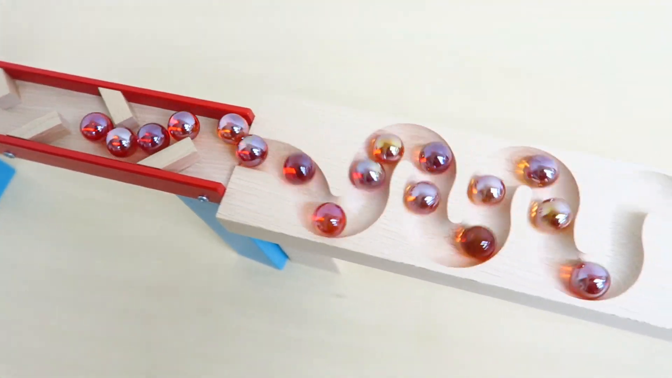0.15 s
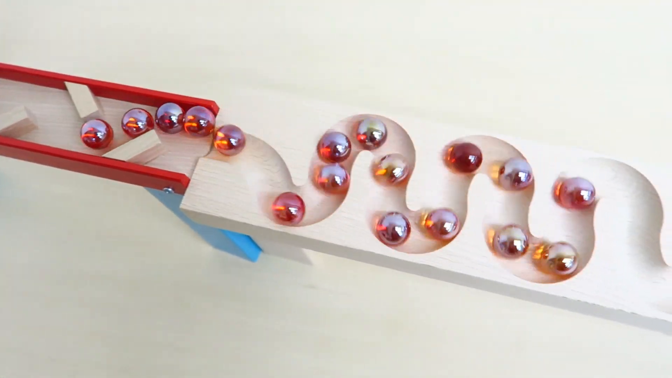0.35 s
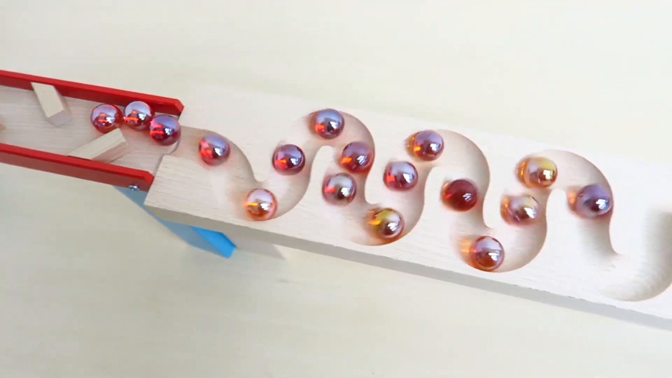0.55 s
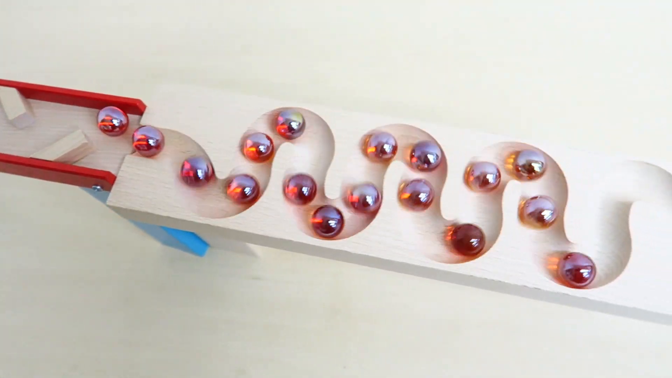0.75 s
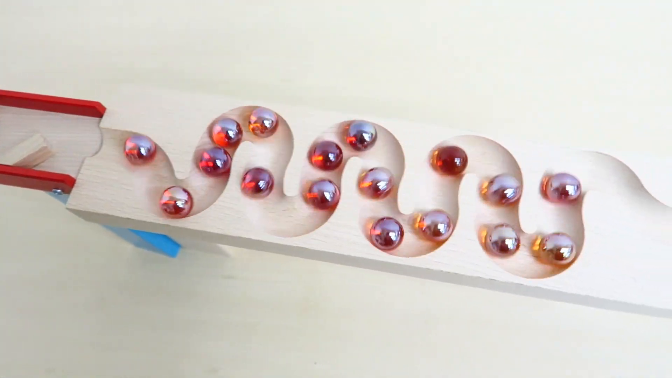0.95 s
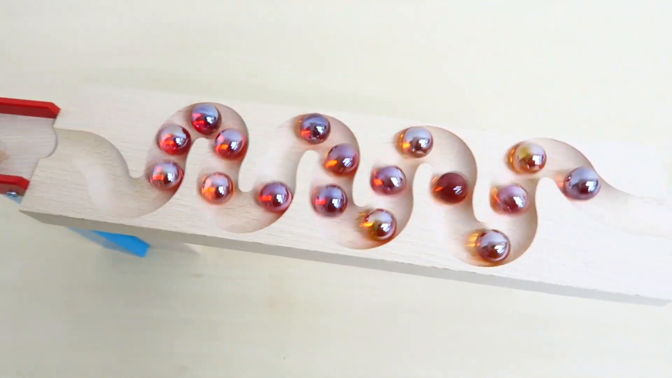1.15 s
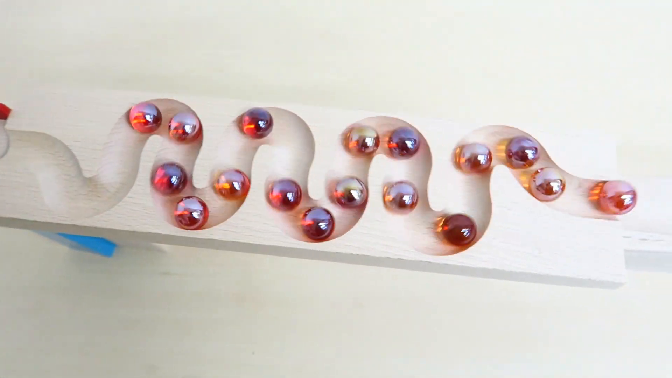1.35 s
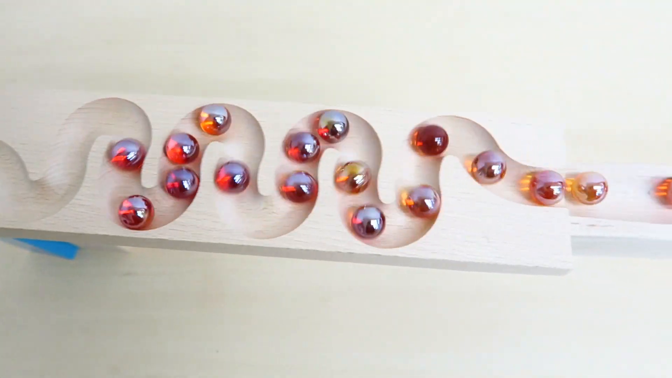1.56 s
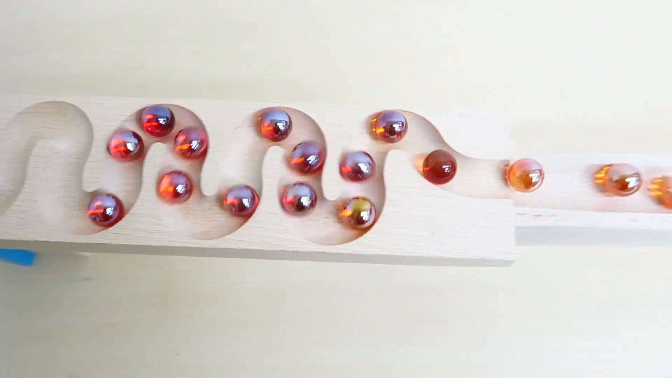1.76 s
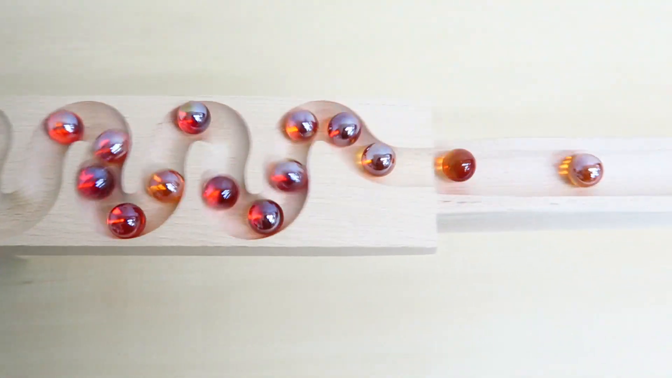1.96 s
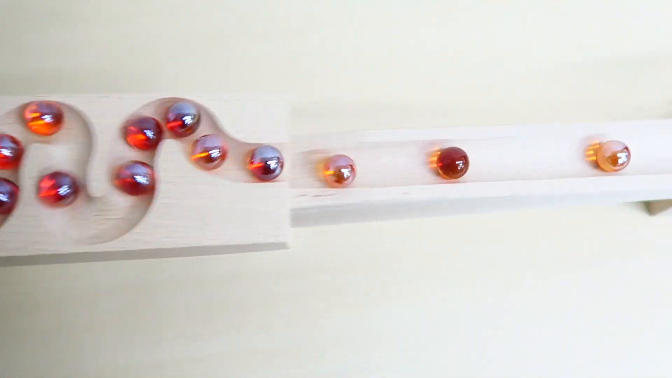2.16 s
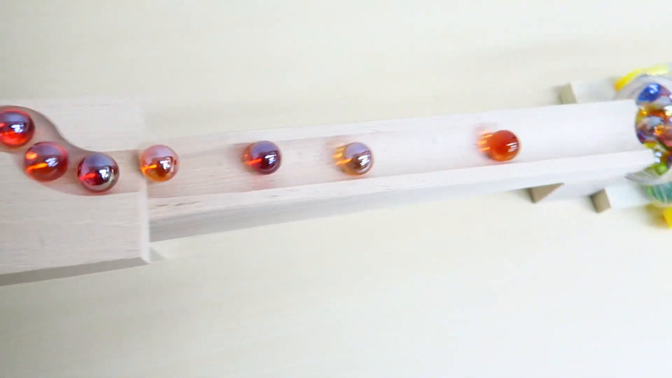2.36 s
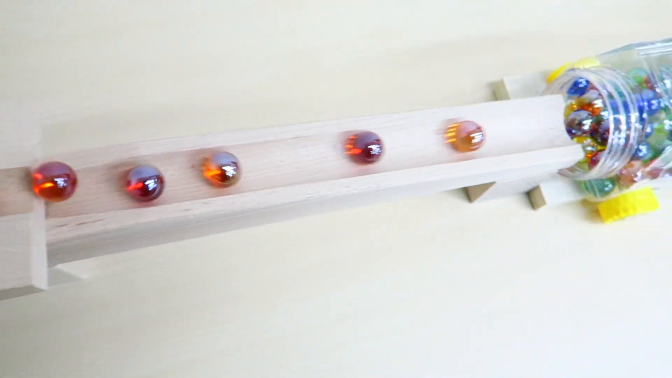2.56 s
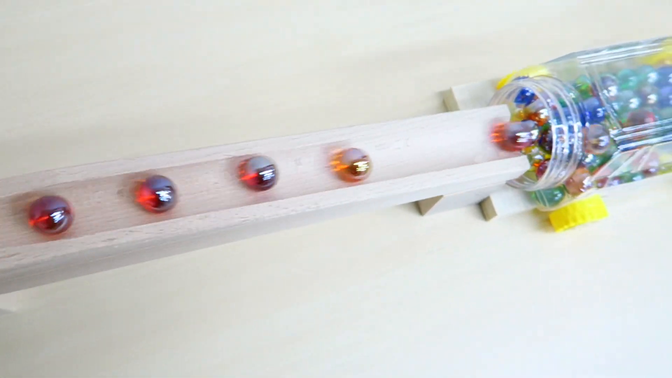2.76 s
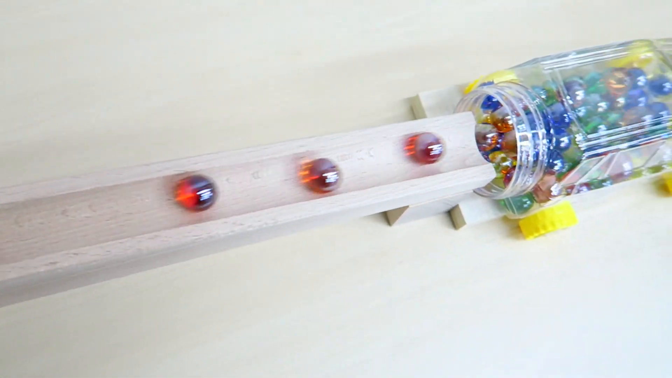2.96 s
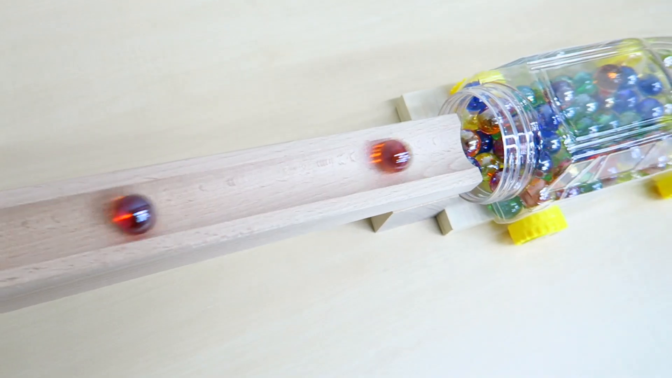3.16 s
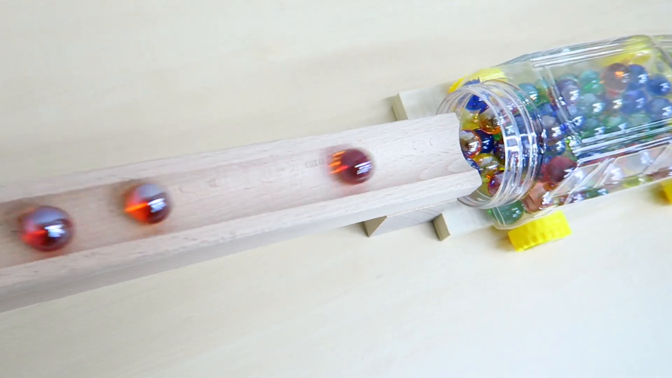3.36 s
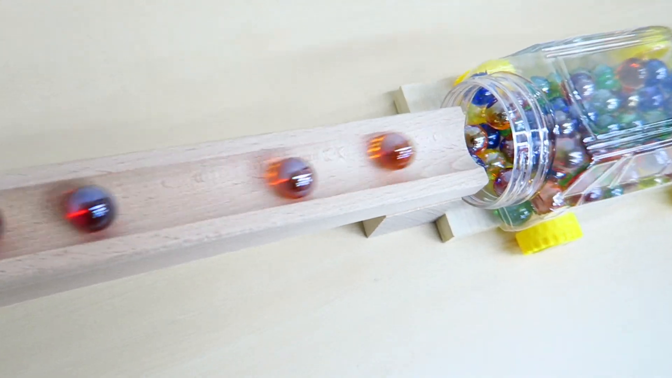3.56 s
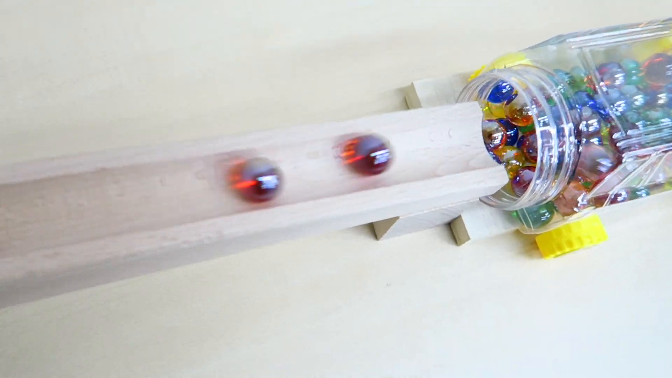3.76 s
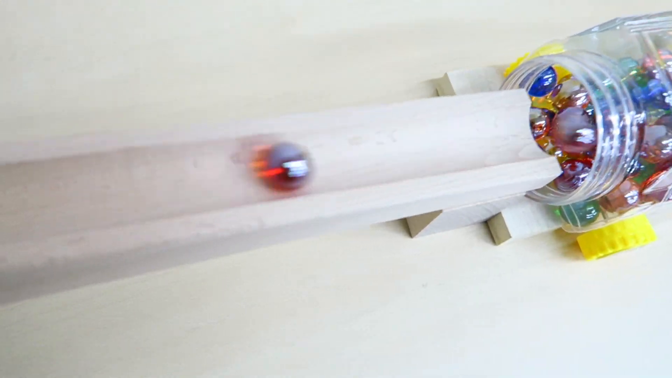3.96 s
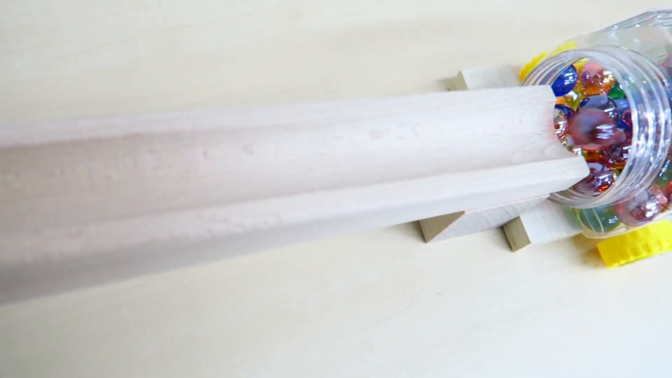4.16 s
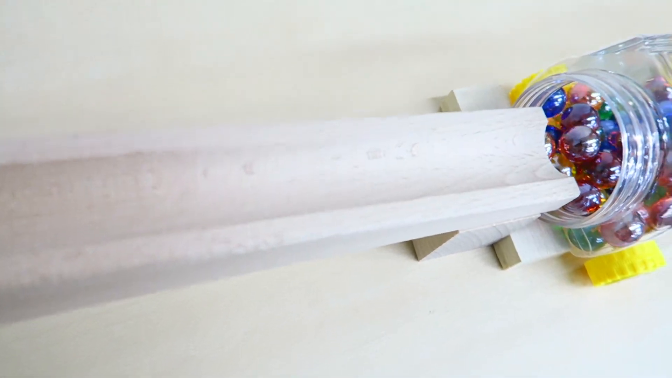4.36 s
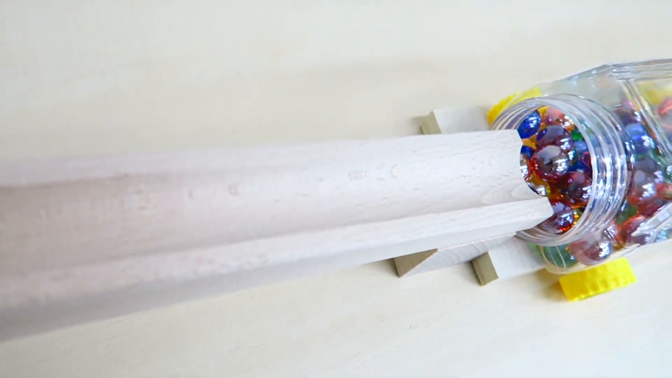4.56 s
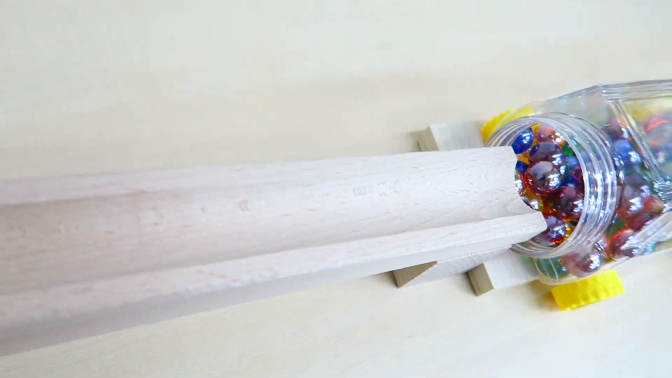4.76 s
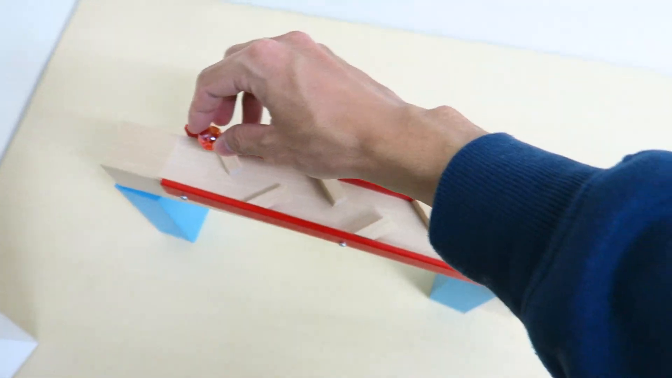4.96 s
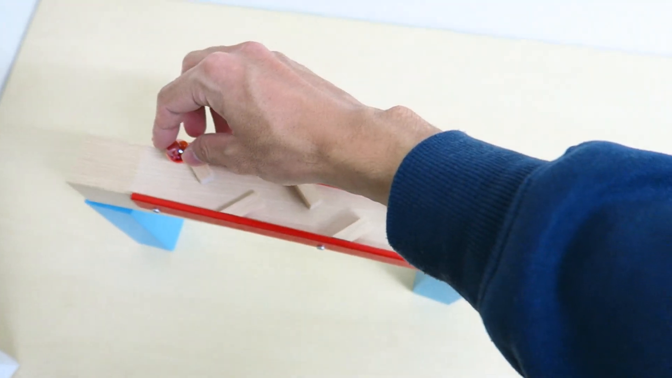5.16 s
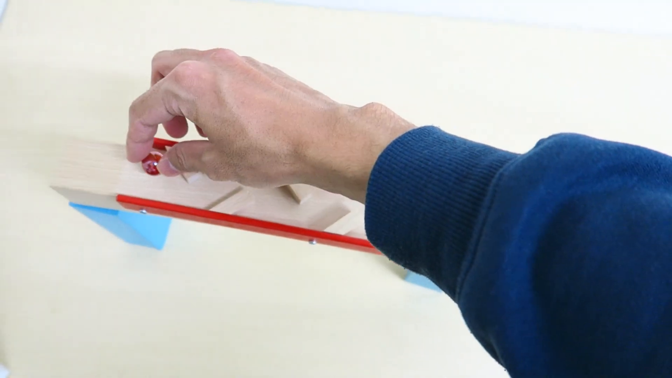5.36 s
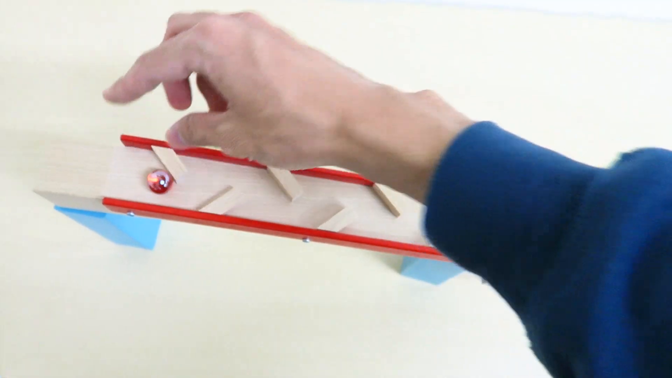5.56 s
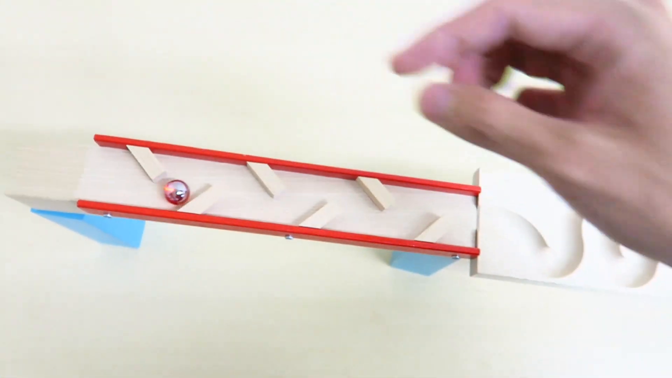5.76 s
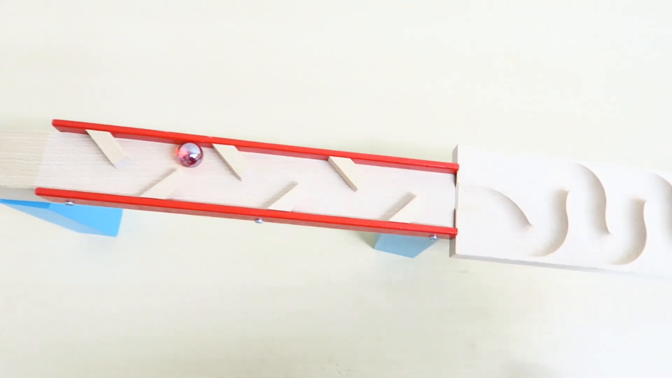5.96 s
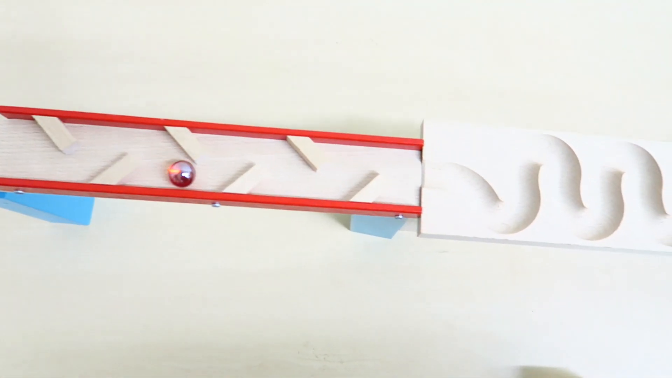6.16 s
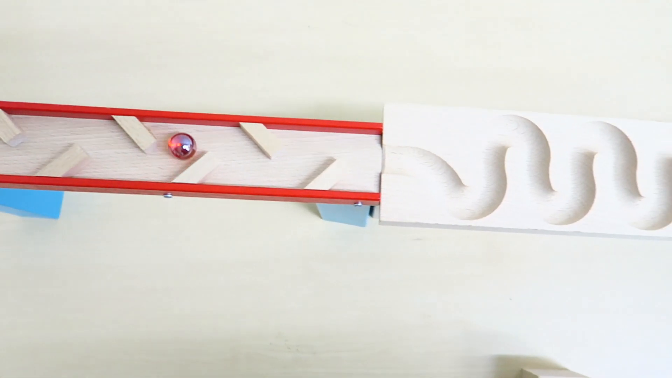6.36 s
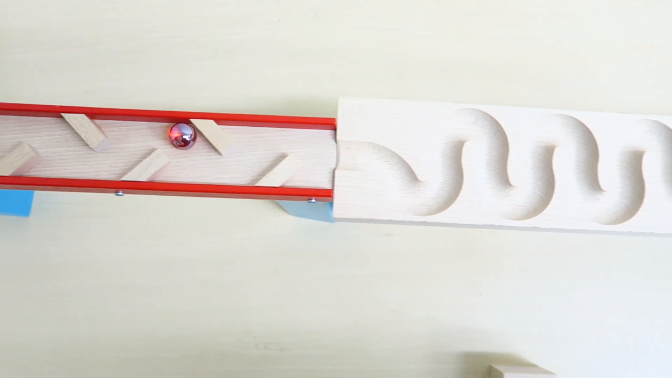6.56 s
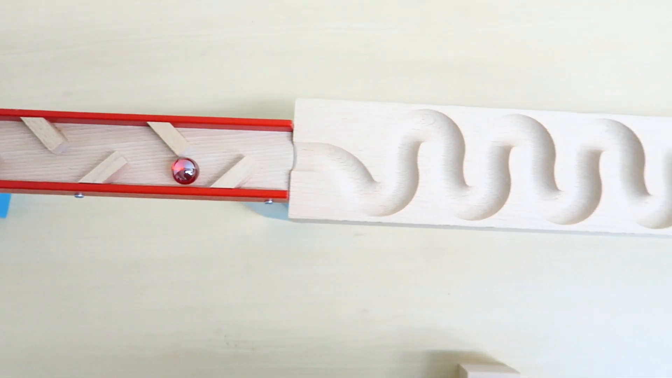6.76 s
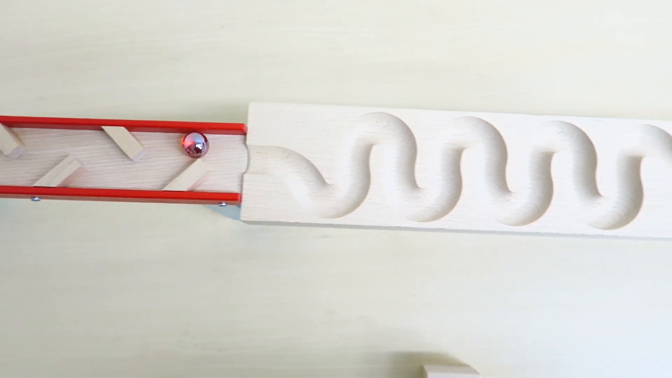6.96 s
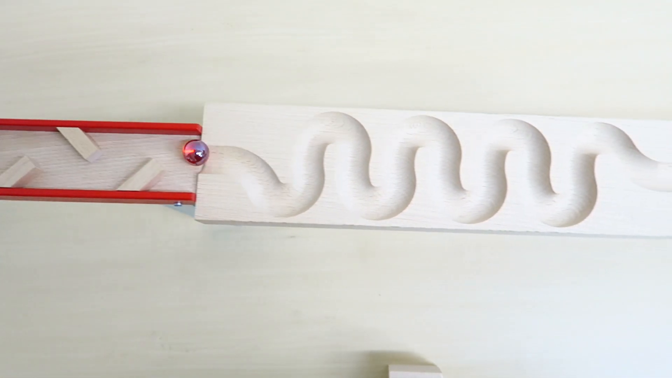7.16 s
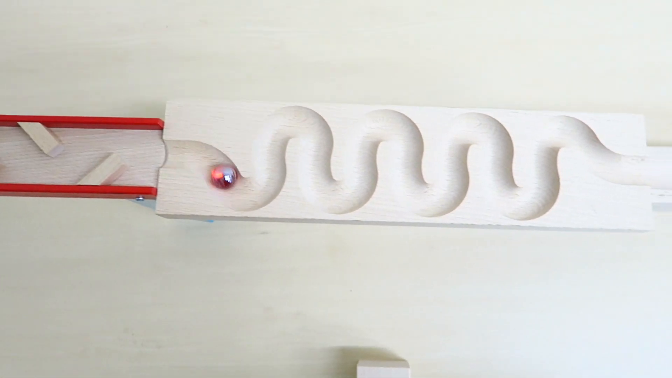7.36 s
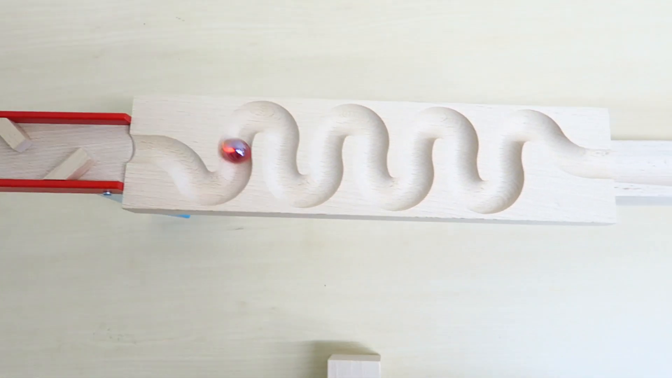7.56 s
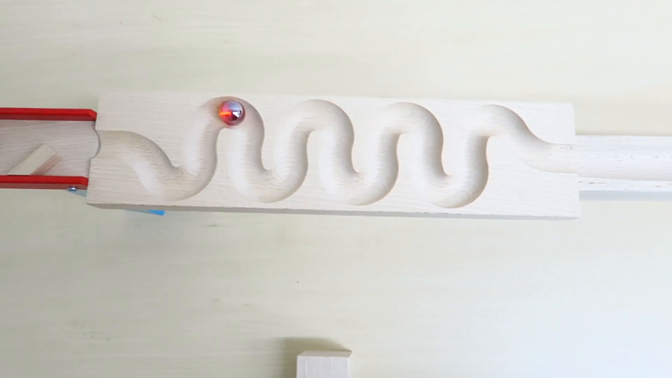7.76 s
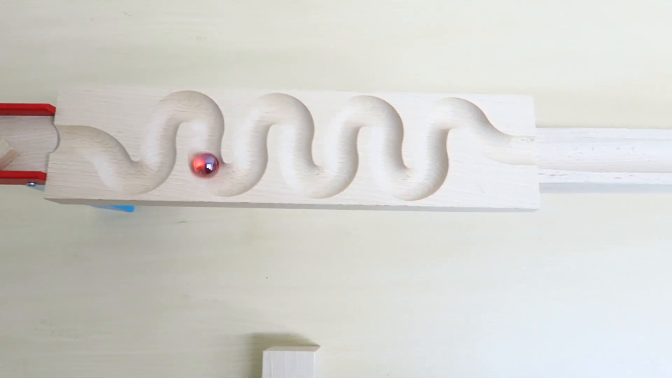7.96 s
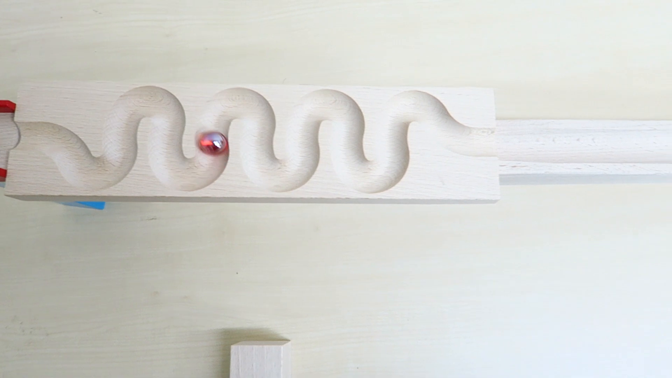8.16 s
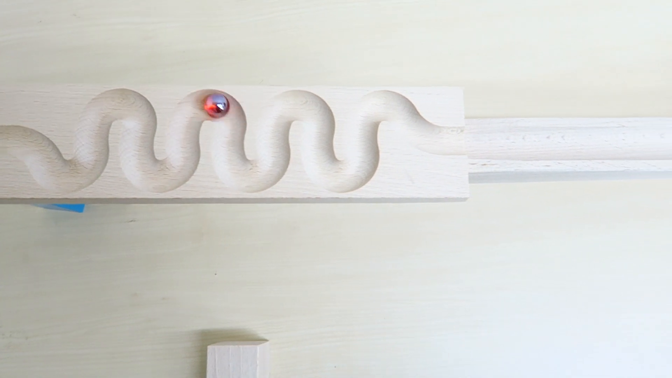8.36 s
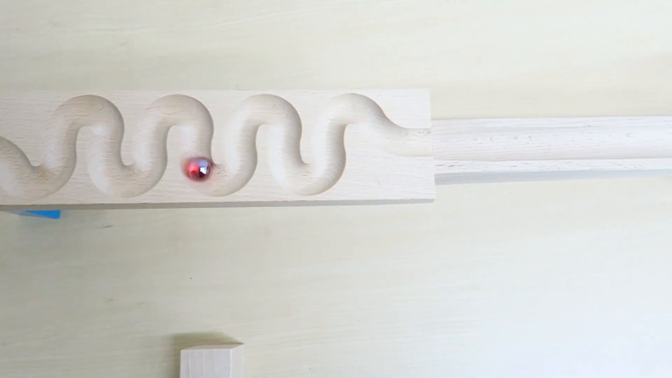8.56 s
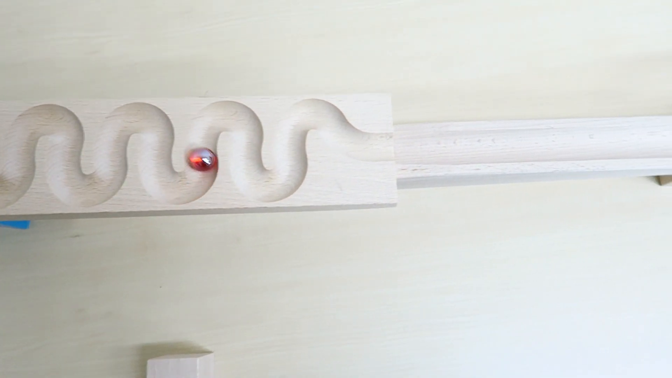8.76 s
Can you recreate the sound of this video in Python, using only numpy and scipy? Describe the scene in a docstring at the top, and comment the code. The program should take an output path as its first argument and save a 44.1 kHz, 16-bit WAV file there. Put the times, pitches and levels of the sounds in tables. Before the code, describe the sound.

In a quiet small room, heard closely in stereo, a crowd of glass marbles is already rolling down a wooden run: low hollow rumble, gritty grain, a faint table boom, quick wooden knocks and small bright glass clicks from 0 to 1.4 seconds. From about 1.5 they drop off a step onto a ramp with sharp double and triple clacks. From 2.1 they crash one after another onto marbles in a plastic jar, rattling and knocking its wall, thinning until a loud landing at 4.3 and tiny dry ticks until 4.6. Near-silence follows. At 5.57 a single marble drops on the board with fast, weakening bounces, then knocks briskly between baffles, roughly every 0.1 second, until 7.1. At 7.26 it clacks into the groove and rolls alone, gradually louder, its rumble swelling and sagging in pitch about five times a second, with faint wall bumps, to the end near 9.

```python
"""Glass marbles roll down a wooden run: bumps of the grain shake the board into a low rumble and lumpy grit.
A crowd of them rumbles through a snaking groove, steps down onto a ramp and clatters into a plastic jar of marbles.
After a pause one marble is dropped at the top, zigzags between slanted baffles and rolls on alone in the groove.
Each impact is a short push, scattered and filtered by the resonances of the thing struck; the heap in the jar
rattles as it shifts. The crowd also excites a low boom of the table, and a quiet room surrounds it all."""
import sys
import numpy as np
from scipy import signal
from scipy.fft import rfft, irfft, next_fast_len
from scipy.io import wavfile
from scipy.ndimage import uniform_filter1d

SR = 44100
rng = np.random.default_rng(int(sys.argv[2]) if len(sys.argv) > 2 else 0)


def dump(signal):
    """Clip the signal to [-1, 1] and save it as 16-bit WAV at the path in sys.argv[1]."""
    limited = np.clip(np.atleast_2d(signal).T, -1, 1)
    pcm = np.round(limited * 32767).astype(np.int16)
    wavfile.write(sys.argv[1], SR, pcm)


N = 388521  # length in samples
TAPS = 16384  # length of impulse responses and single sounds, in samples

# All levels in the tables are relative: each source adds its own gain.
# Meeting a baffle or a side rail: start_s, level_db, hardness_hz, lower_pitch_hz, upper_pitch_hz
BAFFLE_HITS = [(0.0702, 15.4, 6870, 3570, 4600), (0.179, 12.5, 6000, 3050, 4550),
               (0.3219, 14.3, 7100, 2600, 4700), (0.4267, 16.3, 6300, 3980, 4700),
               (5.7622, 13.4, 5100, 2800, 4060), (5.9062, 13.7, 3870, 2720, 3660),
               (6.0285, 18.4, 6800, 2950, 4200), (6.139, 15, 3600, 2850, 3730),
               (6.3, 16.6, 6000, 2580, 3600), (6.4026, 16, 3280, 1520, 3470),
               (6.5457, 16, 7100, 4530, 7200), (6.6145, 9.3, 7400, 2670, 4440),
               (6.701, 12.3, 3440, 3150, 3500), (6.8631, 15.8, 6260, 1490, 3800),
               (6.9602, 18.4, 4200, 1620, 3040), (7.072, 16.7, 8500, 1360, 3200),
               (7.1295, 9.7, 4350, 1650, 3070)]
# Resonances of the baffle board: frequency_hz, width_hz, level_db (over the broad colour)
BAFFLE_MODES = [(265.5, 16, 6), (370, 14, 15.6), (669, 25, 10), (3700, 70, 4.3)]
# Landing on the heap in the jar and tumbling on: start_s, level_db
JAR_HITS = [(2.1363, 28.5), (2.1882, 20.5), (2.274, 28), (2.3366, 30), (2.4771, 23), (2.578, 28),
            (2.654, 25), (2.67, 20.5), (2.692, 26), (2.7831, 23), (2.853, 27.5), (2.944, 26.5), (2.951, 24),
            (3.0444, 26.5), (3.064, 21.5), (3.092, 27.5), (3.183, 26), (3.2775, 29), (3.3992, 26.5),
            (3.459, 21.5), (3.553, 20.5), (3.6304, 28), (3.723, 23), (3.794, 25.5), (3.88, 26),
            (3.905, 23.5), (4.0151, 29), (4.087, 24), (4.161, 22.5), (4.3069, 31.5), (4.4003, 25)]
# Broad colour of the jar and its heap: frequency_hz, level_db
JAR = [(60, -27.5), (400, -5.5), (800, -1.5), (1800, -5.5), (3000, -9.5), (4500, -17), (11000, -22),
       (15000, -31)]
# Resonances of the jar: frequency_hz, width_hz, level_db (over the broad colour)
JAR_MODES = [(212.4, 20, 11.3), (479, 25, 1.8), (590, 33, 1.8)]

# Decay constants of a blow scattered inside the wood, inside a thin board and inside the heap (s)
WOOD_SCATTER_S, STEP_SCATTER_S, JAR_SCATTER_S = .0028, .0017, .005
# First flight after dropping a level (s)
STEP_BOUNCE_S = 0.022
# Each flight lasts this share of the one before; each contact keeps this share of its hardness
REBOUND, SOFTENING = .72, 0.76
# The lone marble: when it is on the baffle board and when it reaches the groove (s)
ON_BAFFLES_S, IN_GROOVE_S = 5.57, 7.28


def gain_of(db):
    """Logarithmic level: converts decibels to amplitude."""
    return 10 ** (np.asarray(db) / 20)


def unit(x):
    """Energy normalization: scales each channel to energy 1."""
    return x / np.sqrt(np.sum(x ** 2, -1, keepdims=True) + 1e-20)


def read(points, hz):
    """Spectral interpolation: joins (Hz, value) points on a log-frequency axis."""
    f, value = np.transpose(points)
    return np.interp(np.log(hz + 1), np.log(f), value)


def level(rows):
    """Amplitude envelope: a (s, dB) curve as a gain over time, at -120 dB outside its span."""
    rows = np.array(rows)
    db = np.interp(np.arange(N) / SR, rows[:, 0], rows[:, 1], -120, -120)
    return uniform_filter1d(gain_of(db), size=300)


def add(mix, s, sound):
    """Superposition: mixes a sound in at time s."""
    part = mix[:, max(round(s * SR), 0):][:, :sound.shape[1]]
    part += sound[:, :part.shape[1]]


def wander(size):
    """Smoothed random fluctuation: chance of spread 1 that changes over about size samples."""
    x = rng.standard_normal(N)
    x = uniform_filter1d(uniform_filter1d(x, size), size // 2)
    return x / np.std(x)


def body(colour, modes, size):
    """Minimum-phase modal response: a broad colour with resonant peaks, made causal by folding its cepstrum."""
    hz = np.fft.rfftfreq(size, 1 / SR)
    peaks = 1 + sum(gain_of(db) ** 2 / (1 + (2 * (hz - f) / width) ** 2) for f, width, db in modes)
    magnitude = gain_of(read(colour, hz)) * np.sqrt(peaks)
    cepstrum = irfft(np.log(magnitude), size)
    cepstrum[1:size // 2] *= 2
    cepstrum[size // 2 + 1:] = 0
    return np.exp(rfft(cepstrum))


def through(x, colour, modes):
    """Linear filtering: convolves a drive signal with the impulse response of a body."""
    impulse_response = irfft(body(colour, modes, TAPS))[None]
    return signal.oaconvolve(x, impulse_response, axes=1)[:, :N]


def grains(per_s, spread_db):
    """Random impulse process: tiny impacts of either sign, with sizes spread exponentially in dB."""
    size = gain_of(spread_db * np.minimum(rng.exponential(1, N), 2.5))
    sign = rng.choice([-1., 1.], (2, N))
    return sign * size * (rng.random(N) < per_s / SR)


def vary(hits, lo_hz, hi_hz):
    """Contact variability: gives each blow one more column, a frequency left to chance."""
    return np.column_stack([hits, lo_hz * (hi_hz / lo_hz) ** rng.random(len(hits))])


def with_hardness(hits, hard_hz):
    """Constant contact stiffness: gives all blows the same hardness, as their third column."""
    return [(s, db, hard_hz, *pitches) for s, db, *pitches in hits]


def bouncing(hits, hard_hz, flight_s, loss_db, count):
    """Inelastic rebound: each (s, dB) drop makes count contacts, ever sooner, weaker and softer."""
    contacts = []
    for s, db in hits:
        for k in range(count):
            delay_s = flight_s * (1 - REBOUND ** k) / (1 - REBOUND)  # sum of the flights so far
            contacts.append((s + delay_s, db + k * loss_db, hard_hz * SOFTENING ** k))
    return contacts


def unrest(spells, fall_db_per_s):
    """Incoherent power addition: the shaking left by each (s, dB, hold s) holds, then dies away."""
    t, power = np.arange(TAPS) / SR, np.zeros((1, N))
    for s, db, hold_s in spells:
        decay_db = fall_db_per_s * np.maximum(t - hold_s, 0)
        add(power, s, gain_of(db - decay_db)[None] ** 2)
    return np.sqrt(power[0])


def blows(hits, colour, modes, db, spot_db, ring_s, ring_db, scatter_s=WOOD_SCATTER_S, ring_hz=5000,
          spot_width_hz=520, order=2, rise_s=1 / SR):
    """Impact excitation: each row (s, dB, hardness Hz, spot pitches Hz..) is a scattered push, then a duller ring.

    The shorter the contact, the higher its hardness, the cutoff of the push."""
    t, hz = np.arange(TAPS) / SR, np.fft.rfftfreq(TAPS, 1 / SR)
    out = np.zeros((2, N))
    response = body(colour, modes, TAPS)
    fade = np.minimum(1, 2 * (1 - t / t[-1])) ** 2
    common = rng.standard_normal((2, 2, TAPS))
    for s, hit_db, hard_hz, *pitches in hits:
        # half of the paths through the body change with the spot that is struck
        paths = common + rng.standard_normal((2, 2, TAPS))
        early, late = paths * np.minimum(t / rise_s, 1)
        scatter = rfft(early * np.exp(-t / scatter_s))
        scatter /= np.sqrt(uniform_filter1d(abs(scatter) ** 2, size=400))  # scattering keeps each band's energy
        ring = gain_of(ring_db) * rfft(unit(late * np.exp(-t / ring_s)))
        ring = ring / (1 + 1j * hz / ring_hz)
        contact = signal.freqs(*signal.butter(order, 1, analog=True), hz / hard_hz)[1]
        # each spot favours its own pitches
        spot = 1 + sum(gain_of(spot_db) / (1 + 2j * (hz - f) / spot_width_hz) for f in pitches)
        sound = irfft((scatter + ring) * contact * spot * response)
        add(out, s, gain_of(db + hit_db) * fade * sound)
    return out


def rolling(strength, glide, modes, rumble_db, grit_db, bumps_per_s, dull_hz, lumps_db=2):
    """Roughness excitation: grain bumps give grit and a low rumble whose pitch moves by the share glide."""
    # Colour of rolling on wood: frequency_hz, level_db
    roll_colour = [(30, -27), (180, -12.5), (280, 0.5), (550, -0.5), (850, -4), (1900, -17.5),
                   (2700, -19.5), (4000, -38.5), (16000, -60)]
    x = through(grains(bumps_per_s, spread_db=1.5), roll_colour, modes)
    low = signal.sosfiltfilt(signal.butter(3, 480, fs=SR, output="sos"), x)
    grit = signal.sosfilt(signal.butter(1, dull_hz, fs=SR, output="sos"), x - low)
    grit *= gain_of(lumps_db * wander(size=1200))
    # reading the rumble faster or slower moves its pitch
    position = np.cumsum(1 + glide) % N
    low = np.array([np.interp(position, np.arange(N), channel) for channel in low])
    rumble = gain_of(rumble_db) * low / np.std(low)
    return strength * (rumble + gain_of(grit_db) * grit / np.std(grit))


def hush():
    """Filtered ambient noise: low rumble and faint hiss of the quiet room."""
    # Colour of the room noise: frequency_hz, level_db (per Hz)
    hush_colour = [(12, -42), (20, -6.5), (60, -12), (125, -8.5), (214, -24.5), (357, -25.5), (4490, -45.5),
                   (12500, -57), (16200, -83), (22000, -120)]
    x = through(rng.standard_normal((2, N)), hush_colour, [])
    return gain_of(-48) * x / np.std(x[0])


def room(x, db):
    """Diffuse reverberation: a small room's tail, whose treble dies first."""
    # Room decay: frequency_hz, t60_s
    decay = [(200, 0.44), (1400, 0.47), (4000, 0.26), (10000, 0.25)]
    noise = rng.standard_normal((2, TAPS)) * (np.arange(TAPS) / SR > .008)  # the tail starts after 8 ms
    hz, t, z = signal.stft(noise, SR, nperseg=256)
    fall = gain_of(-60 * t / read(decay, hz)[:, None])
    tail = signal.istft(z * fall, SR, nperseg=256)[1]
    return x + gain_of(db) * signal.oaconvolve(x[:1], unit(tail), axes=1)[:, :N]


def boom(db):
    """Resonant excitation: the rolling crowd shakes the table top at its lowest resonance."""
    # Level of the table's boom under the crowd: start_s, level_db
    boom_level = [(0.0, -27), (0.4, -40.5), (0.7, -33.5), (0.8, -23.5), (0.93, -22), (1.03, -38.5),
                  (1.38, -21.5), (1.6, -25), (1.85, -33.5), (2.8, -38.5), (3.9, -33.5), (4.5, -51.5)]
    resonance_hz, width_hz = 135, 8
    evenness = 0.35  # exponent by which steady rolling evens out the chance swelling
    hz = np.fft.rfftfreq(N, 1 / SR)
    resonance = 1 / (1 + (2 * (hz - resonance_hz) / width_hz) ** 2)
    x = irfft(rfft(rng.standard_normal((2, N))) * resonance, N)
    x /= abs(signal.hilbert(x, next_fast_len(N))[:, :N]) ** evenness
    return gain_of(db) * level(boom_level) * x / np.std(x[0])


def heap_shift():
    """Decaying agitation: each landing but the last marble's stirs the heap briefly, and some slides add to it."""
    # Slides of the heap, brief or longer: start_s, level_db, length_s
    slides = [(2.58, 12, 0.014), (2.983, 24, 0.037), (3.041, 24.5, .07), (3.19, 7.5, 0.025),
              (3.799, 32, 0.034), (4.059, 29.5, 0.099)]
    last_marble_s = 4.27  # from here on the landings no longer shift the heap
    stirs = [(s, db, 0.035) for s, db in JAR_HITS if s < last_marble_s]  # each holds 0.035 s
    return unrest(stirs + slides, fall_db_per_s=250)


def heap_rattle(db, clicks_per_s, spread_db, ring_db, ring_width_hz, count):
    """Dense collisions: the shifting heap clacks through the jar's wall, each spot with its own brief ring."""
    t, x = np.arange(1024) / SR, np.zeros((2, N))
    for hz in np.geomspace(560, 3000, count):
        scatter = rng.standard_normal((2, len(t))) * np.exp(-t / WOOD_SCATTER_S * 2)
        clicks = grains(clicks_per_s / count, spread_db)
        clacks = signal.oaconvolve(clicks, unit(scatter), axes=1)[:, :N]
        x += through(clacks, JAR, JAR_MODES + [(hz, ring_width_hz, ring_db)])
    return gain_of(db) * heap_shift() * x / np.std(x[0])


def jar_knocks():
    """Soft impact on a shell: dull knocks on the jar's plastic wall."""
    # Knocks: start_s, level_db
    knocks = [(2.362, 12), (2.728, 28.5), (2.815, 25.5), (3.1185, 28.5), (3.853, 17), (4.064, 19)]
    return blows(with_hardness(knocks, hard_hz=4500), JAR, JAR_MODES, db=-6, spot_db=0,
                 ring_s=0.013, ring_db=6.5)


def coming_to_rest():
    """Weak damped impacts: the last marble rocks to rest on top of the heap with dry ticks."""
    # Ticks: start_s, level_db
    ticks = [(4.4997, 5), (4.5217, 4.5), (4.6043, 1)]
    return blows(with_hardness(ticks, hard_hz=8900), JAR, JAR_MODES, db=-2.5, spot_db=0,
                 ring_s=0.0089, ring_db=-4)


def jar_landings():
    """Multiple scattering: marbles land on the heap, and the hard blow spreads and rings within it."""
    hits = vary(JAR_HITS, 16000, 28000)  # hardness
    hits = vary(vary(hits, 540, 1900), 2600, 10000)  # two pitches of the spot
    return blows(hits, JAR, JAR_MODES, db=-5.0, spot_db=0, ring_s=.028, ring_db=-1.0,
                 scatter_s=JAR_SCATTER_S, ring_hz=9000, spot_width_hz=130)


def glass_clicks():
    """Stiff contact: marble against marble, a very short push with a bright spectrum."""
    # Marble against marble: start_s, level_db
    clicks = [(0.3695, -8.5), (0.4645, -6.5), (0.5003, -14), (0.5756, -6), (0.6508, -8), (0.7795, -11.5),
              (1.02, -9.5), (1.1136, -13.5), (1.1932, -13.5), (1.4049, -8.5)]
    # Broad colour of struck glass: frequency_hz, level_db
    glass_colour = [(1000, -22), (4500, 4), (10000, -1.5), (15000, -6.5)]
    hits = vary(vary(clicks, 11000, 13000), 6300, 8600)  # hardness, then pitch
    return blows(hits, glass_colour, [], db=3.5, spot_db=1.5, ring_s=0.012, ring_db=-7)


def entry_drops():
    """Impact with one weak rebound: marbles drop from the baffle board into the groove."""
    # Drops into the groove: start_s, level_db
    drops = [(0.0261, 24), (0.1215, 25), (0.2249, 26), (0.348, 16.5), (0.5228, 24), (0.7934, 24.5),
             (0.945, 24), (7.2632, 26)]
    # Broad colour of the groove's entry: frequency_hz, level_db
    entry_colour = [(60, -52), (400, -8.5), (1100, -15), (1700, -7), (2600, -6.5), (4500, -17.5),
                    (15000, -16)]
    # Its resonances: frequency_hz, width_hz, level_db (over the broad colour)
    entry_modes = [(1660, 130, 8.5), (2520, 170, 2.5), (3060, 50, 11)]
    hits = bouncing(drops, hard_hz=3560, flight_s=STEP_BOUNCE_S, loss_db=-21, count=2)
    return blows(hits, entry_colour, entry_modes, db=1.5, spot_db=0, ring_s=0.011, ring_db=-1.5,
                 scatter_s=STEP_SCATTER_S, order=3)


def step_drops():
    """Repeated rebound: marbles drop from the groove onto the ramp, and each bounces twice."""
    # Drops onto the ramp: start_s, level_db
    drops = [(1.5441, 29.5), (1.6882, 27), (1.7691, 28.5), (1.8217, 19), (1.9083, 27.5), (1.9766, 17),
             (2.0883, 25.5), (2.2486, 24.5), (2.3667, 23), (2.4331, 22.5), (2.505, 23.5), (2.6002, 22.5),
             (2.8117, 18), (3.0442, 22), (3.2956, 16), (3.5181, 19.5)]
    # Broad colour of the ramp: frequency_hz, level_db
    step_colour = [(50, -50), (160, -29), (1500, -8), (4200, -16.5), (6000, -23), (8000, -28.5),
                   (15000, -29.5)]
    # Its resonances: frequency_hz, width_hz, level_db (over the broad colour)
    step_modes = [(130, 18, 27), (1596, 16, 7.5), (5070, 290, 12)]
    hits = bouncing(drops, hard_hz=5900, flight_s=STEP_BOUNCE_S, loss_db=-7.5, count=3)
    return blows(vary(hits, 5000, 5770), step_colour, step_modes, db=-1.5, spot_db=4.5,
                 ring_s=0.0082, ring_db=0.5, scatter_s=STEP_SCATTER_S)


def wall_bumps():
    """Position-dependent modes: marbles bump the groove's wall, and each spot favours its own pitches."""
    # Bumps: start_s, level_db, pitch_hz (of the struck spot)
    bumps = [(0.0534, 21, 3080), (0.0951, 17, 3120), (0.165, 18.5, 2940), (0.2678, 20.5, 3020),
             (0.3695, 14, 2930), (0.5549, 19.5, 2970), (0.723, 18.5, 3660), (0.8498, 17.5, 3450),
             (0.9808, 19.5, 3520), (0.637, 12.5, 2430), (7.3294, 14, 2940), (7.518, -2, 3480),
             (7.589, 6, 2960), (8.017, 3.5, 3200), (8.124, -2.5, 2360), (8.4182, -6, 2460),
             (8.5988, 2.5, 2930)]
    # Broad colour of the wall: frequency_hz, level_db
    wall_colour = [(60, -27), (200, -10), (800, -11), (1600, -11.5), (3000, -8), (5000, -16.5),
                   (15000, -18.5)]
    # Its resonances: frequency_hz, width_hz, level_db (over the broad colour)
    wall_modes = [(1660, 110, 5)]
    hits = vary(with_hardness(bumps, hard_hz=3240), 1100, 2400)  # a second pitch
    return blows(hits, wall_colour, wall_modes, db=0.5, spot_db=9.5, ring_s=0.018, ring_db=6.0,
                 spot_width_hz=120, order=3)


def baffle_knocks():
    """Narrow local resonance: marbles knock on baffles and side rails, and the struck spots ring out."""
    # Broad colour of the baffle board: frequency_hz, level_db
    baffle_colour = [(60, -30.5), (370, -17.5), (1000, -18), (1600, -9), (4000, -15), (7000, -15.5),
                     (15000, -6)]
    hits = vary(BAFFLE_HITS, 4400, 6800)  # a third pitch
    return blows(hits, baffle_colour, BAFFLE_MODES, db=5.5, spot_db=9.0, ring_s=0.014, ring_db=-3.5,
                 scatter_s=STEP_SCATTER_S, spot_width_hz=84, order=6, rise_s=0.003)


def drop_contacts():
    """Inelastic rebound: the lone marble, let go over the top board, makes five ever weaker contacts."""
    # The drop: start_s, level_db
    lone_drop = [(5.5681, 25.5)]
    return bouncing(lone_drop, hard_hz=6700, flight_s=0.051, loss_db=-3, count=5)


def board_drop(contacts):
    """Plate impact: the lone marble's bounces strike the top board."""
    # Broad colour of the top board: frequency_hz, level_db
    board_colour = [(60, -21), (180, -8), (800, -5), (3000, -15), (5000, -22.5), (15000, -57)]
    # Its resonances: frequency_hz, width_hz, level_db (over the broad colour)
    board_modes = [(336, 27, 2.7), (1760, 110, 3.3)]
    return blows(vary(contacts, 3700, 4100), board_colour, board_modes, db=-2.0, spot_db=-0.5,
                 ring_s=0.011, ring_db=5.5)


def baffle_rolling(contacts):
    """Steady roughness excitation: even rolling between baffles, plus chatter after each knock or bounce."""
    roll_db, chatter_db = -37.5, -45.5  # chatter rises further with each knock's level
    even = level([(ON_BAFFLES_S, roll_db), (IN_GROOVE_S, roll_db)])
    spells = [(s, db, 0.018) for s, db, *_ in contacts + BAFFLE_HITS]  # each holds 0.018 s
    chatter = gain_of(chatter_db) * unrest(spells, fall_db_per_s=153)
    pitch_waver = .025 * wander(size=3000)
    return rolling(np.hypot(even, chatter), pitch_waver, BAFFLE_MODES, rumble_db=-0.5, grit_db=-11,
                   bumps_per_s=870, dull_hz=3000)


def bends():
    """Periodic motion: the lone marble's way through the groove, 1 in a bend, -1 on the straight between two."""
    a_bend_s, bend_every_s = 8.4, 0.198  # moment of one of the bends, time between bends
    return np.cos(2 * np.pi * (np.arange(N) / SR - a_bend_s) / bend_every_s)


def lone_groove_rolling():
    """Speed-dependent excitation: one marble gathers speed, and in every bend swells and sags in pitch."""
    # Resonances of the groove under one marble: frequency_hz, width_hz, level_db
    lone_modes = [(138.4, 8, 21.5), (272, 30, 11.5), (676, 28, 11), (774, 31, 14), (1090, 40, 11.5),
                  (1780, 30, 10)]
    start_db, speedup_db_per_s, bend_db, bend_sag = -34, 2, 2.5, .07  # the sag is a share of the pitch
    t, bend = np.arange(N) / SR, bends()
    rise_db = speedup_db_per_s * (t - IN_GROOVE_S)
    strength = (t > IN_GROOVE_S) * gain_of(start_db + rise_db + bend_db * bend)
    return rolling(strength, -bend_sag * bend, lone_modes, rumble_db=-2, grit_db=-7.5,
                   bumps_per_s=1000, dull_hz=1800, lumps_db=6.0)


def crowd_rolling():
    """Broadband roughness excitation: the crowd rumbles over the grain and fades as the run empties."""
    # Rolling strength of the crowd: start_s, level_db
    crowd_level = [(0.0, -28), (0.62, -26.5), (0.85, -23.5), (1.08, -26), (1.4, -25), (1.7, -23.5),
                   (1.88, -28), (3.55, -33.5), (4.07, -32.5), (4.43, -43.5), (4.55, -79.5)]
    # Resonances under the rolling marbles: frequency_hz, width_hz, level_db
    groove_modes = [(273, 10, 8), (339.3, 25, 0.5), (406, 18, 0), (878, 12, 9.5)]
    pitch_waver = .05 * wander(size=3000)
    return rolling(level(crowd_level), pitch_waver, groove_modes, rumble_db=-1.0, grit_db=-2.0,
                   bumps_per_s=2000, dull_hz=8620)


def scene():
    """Mid-side stereophony: all sources as mid and side, heard in the room, then as left and right."""
    # Width of the sound between the two microphones: frequency_hz, level_db (side against mid)
    side_colour = [(100, -27), (350, -17.5), (2800, -15), (9000, -3.5)]
    contacts = drop_contacts()
    x = boom(db=-2.0)
    x += heap_rattle(db=-49, clicks_per_s=420, spread_db=-0.5, ring_db=17, ring_width_hz=73, count=20)
    x += jar_knocks() + coming_to_rest() + jar_landings()
    x += glass_clicks() + entry_drops() + step_drops() + wall_bumps()
    x += baffle_knocks() + board_drop(contacts)
    x += baffle_rolling(contacts) + lone_groove_rolling()
    x += crowd_rolling()
    mid, side = room(x, db=-13.5) + hush()
    side = through(side[None], side_colour, [])[0]
    return np.array([mid + side, mid - side])


def record(dry):
    """Band limiting and saturation: top treble falls away, loud peaks are rounded, a brief fade closes the sound."""
    soft = through(dry, [(12200, -1.0), (13200, -8.5), (16000, -23)], [])
    rounded = soft / (1 + (soft / .85) ** 4) ** .25
    rounded *= np.minimum(1, np.arange(N)[::-1] / 300)
    low_pass = signal.firwin(511, 16000, window=("kaiser", 9), fs=SR)  # cutoff 16 kHz
    return signal.oaconvolve(rounded, low_pass[None], "same")


dry = scene()
out = record(dry)
dump(out)
```